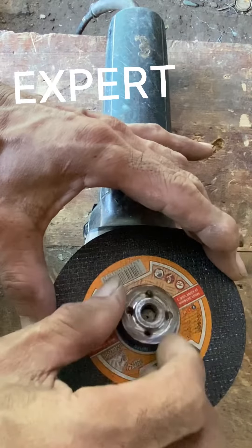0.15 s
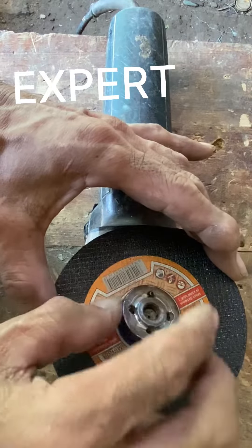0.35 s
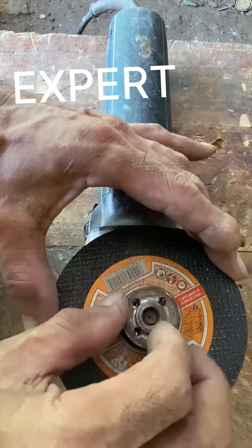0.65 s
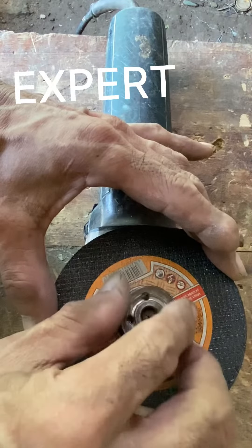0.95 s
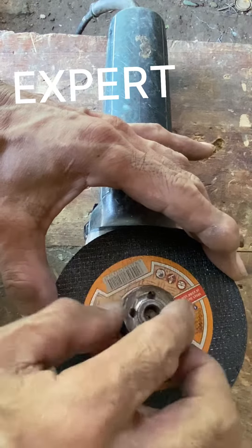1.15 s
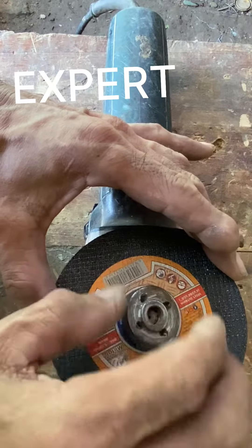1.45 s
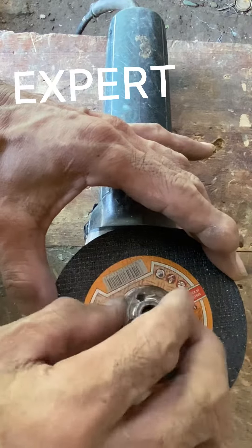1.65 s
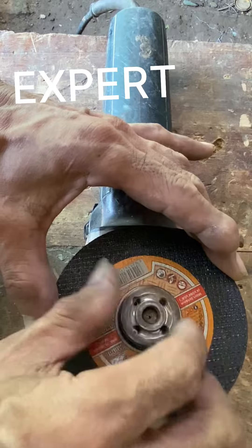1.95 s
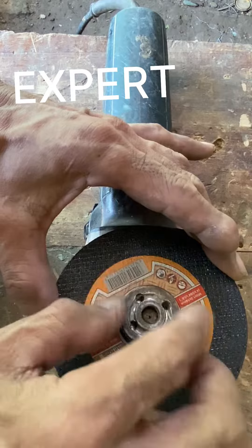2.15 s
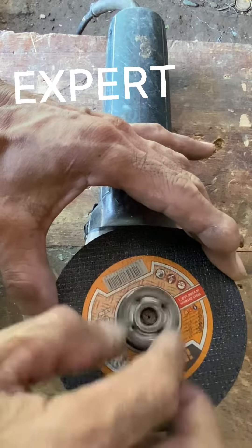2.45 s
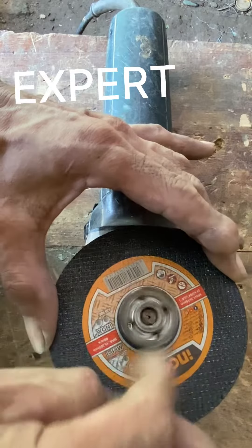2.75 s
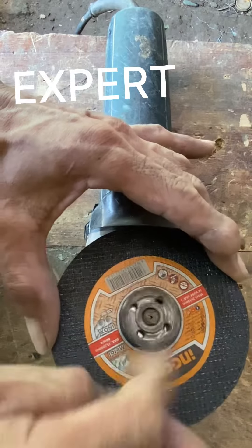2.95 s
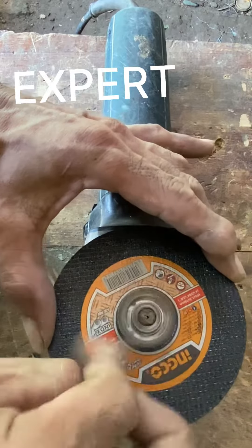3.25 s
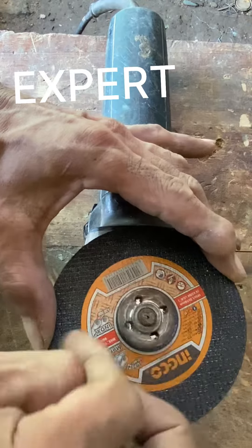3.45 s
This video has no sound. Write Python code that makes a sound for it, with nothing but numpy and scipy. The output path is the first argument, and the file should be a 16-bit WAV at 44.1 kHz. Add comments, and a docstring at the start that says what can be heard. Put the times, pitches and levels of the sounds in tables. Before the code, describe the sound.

A steel nut clicks and scrapes as fingers thread it onto a hand grinder. Scattered taps, some briefly ringing, grow into a busier rattling whirr, with soft bench thumps and faint outdoor hiss behind.

```python
"""A steel lock nut, spun by the fingers down the spindle of a hand grinder on a wooden bench outdoors.
It taps and scrapes on thread and cutting disc, driving their resonances with grit, and a few knocks
set it ringing freely. Late on it whirrs down the thread and a slipping fingertip squeaks.
The bench booms softly under each push; distant rumble and hiss lie below."""
import sys
import numpy as np
from scipy import signal
from scipy.io import wavfile

SR = 44100
rng = np.random.default_rng(int(sys.argv[2]) if len(sys.argv) > 2 else 0)


def inscribe(sig):
    """Save sig as 16-bit PCM at rate SR to the path in sys.argv[1].

    A 1-D sig is mono; a 2-D sig holds one channel per row.
    Samples are clipped to [-1, 1] before scaling.
    """
    pcm = np.round(np.clip(np.atleast_2d(sig).T, -1, 1) * 32767)
    wavfile.write(sys.argv[1], SR, pcm.astype(np.int16))


N = 158760

# Knocks of the nut on thread and disc: start_s, level_db (mid band, 1.1-2.4 kHz), then against it
# lowest_db, low_db, upper_db, high_db, top_db; pan_db, rattle_db, base_t60_s
TAPS = [(0.194, -53.5, -11, 14, -27.5, -37, -37, 1.8333, -32, 0.018),
        (0.2124, -42, -3, 7, -19, -34, -30, 3, -20, 0.013),
        (0.518, -37.5, -10.5, -1, -6, -18.5, -32, 5.4, -18, 0.011),
        (0.7432, -55.5, 7, 5, -22, -18, -20, 1.6, -9.5, 0.0071),
        (1.1612, -39.5, -7, -5, -3, -30, -40, 2.8, -11, 0.0092),
        (1.169, -30, -11, -7.5, -7, -17.5, -24, 5.7, -16, 0.04),
        (1.3453, -23.5, -39, -8, -9.5, -7.5, -12.5, 7.9, -21, 0.0077),
        (1.3554, -33, -13.5, -10.5, -9, -31, -40, 4.4, -24, 0.025),
        (1.3668, -43.5, -7, -5, -2, -30, -40, 3.5, -23, 0.01),
        (1.514, -51, -15, 6, -8, -17, -10, 3.1, -12, 0.0084),
        (1.5851, -33, -9, 2.5, 2, -19, -28, 6.8, -15, 0.012),
        (1.8721, -51, 5.5, 3.5, -25, -24, -29, 6.1, -5, 0.0037),
        (2.377, -35, -6, -7, -1, -20, -35, 5.3, -15, 0.0078),
        (2.4228, -47, -2, -1, 5, -7, -24, 5.9, -2, 0.0049),
        (2.4519, -28.5, -30, -5.5, -2, -2.5, -25, 6.4, -23, 0.013),
        (2.4545, -38.5, -1, -8, -10, -4.5, -25, 5, -6.5, 0.018),
        (2.586, -48.5, -7, 9.5, -11, -7, -11, 1.2, -11, 0.015),
        (2.6306, -32, -22, 0, 3.5, -24, -31, 6.7, -8.5, 0.0093),
        (2.6393, -28.5, -28, -12, 0.5, -16, -28, 6, -22, 0.0097),
        (2.7118, -39.5, 2.5, 2.5, -19, -31, -20, 7.6, -17, 0.017),
        (2.7214, -42.5, 4.5, 10, -27, -32, -31, 10, -34, 0.0055),
        (2.7786, -39.5, -3, 5, -28, -33, -39, 7.1, -33, 0.015),
        (2.809, -44, -12, -15, -14, -8, -15, 6.7, -14.5, 0.0062),
        (2.835, -34.5, -35, -15, 3.5, -3.5, -23, 9, -21, 0.0059),
        (2.9052, -18.5, -37, -1.5, 3, -7, -26, 5.6, -19.5, 0.0065),
        (2.9124, -32.5, 0, -21, -9, -28, -39, 4.7, -28, 0.013),
        (2.9705, -35, -25, 2, 0.5, 8.5, -17, 6.1, -15, 0.008),
        (3.1694, -31.5, -24, -7, -2.5, -15.5, -37, 7.9, -46, 0.0085),
        (3.2125, -49, -15, -6, 5, -24, -35, 8, -28, 0.0058),
        (3.2245, -35, -10, -5.5, -5, -24, -35, 11, -23, 0.0076),
        (3.2585, -36, -14, -2, -10, -30, -29, 8.5, -26, 0.0065)]
# How late the right side hears each of the six bands, low to high: lag_s
RIGHT_LAG_S = [0.00035, 0.00016, 0.00013, 0.00023, 0.0002673, 0.000079]
STRIKE_DB = 17   # a tap's first impact over the grit that follows
BENCH_PAN_DB, FINGER_PAN_DB = -5, 1.5
SIZZLE_HZ = (13700, 16300)   # band of the tap snaps and the nail hiss


def amp(db):
    """Decibels to gain."""
    return 10 ** (np.asarray(db) / 20)


def unit_rms(x):
    """Scale to unit rms."""
    return x / np.sqrt(np.mean(x ** 2) + 1e-20)


def curves(rows):
    """One sample-by-sample curve for each column after time_s."""
    times, *columns = np.transpose(rows)
    return [np.interp(np.arange(N) / SR, times, column) for column in columns]


def at_hz(points, hz):
    """Read a (freq_hz, value) curve on a log frequency axis."""
    freqs, values = np.transpose(points)
    return np.interp(np.log(hz), np.log(freqs), values)


def pan(pan_db):
    """Left and right gains as a column; positive leans left."""
    return amp([[pan_db / 2], [-pan_db / 2]])


def drift(rate_hz):
    """Slow random wander of about unit rms."""
    hop = 40
    pole = np.exp(-2 * np.pi * rate_hz * hop / SR)
    slow = signal.lfilter([1], [1, -2 * pole, pole * pole], rng.standard_normal(N // hop + 2002))[2000:]
    return np.interp(np.arange(N) / hop, np.arange(len(slow)), unit_rms(slow))


def resonate(x, hz, width_hz):
    """Two-pole resonance with unit gain at its peak."""
    r = np.exp(-np.pi * width_hz / SR)
    feedback = [1, -2 * r * np.cos(2 * np.pi * hz / SR), r * r]
    return signal.lfilter([(1 - r * r) / 2, 0, (r * r - 1) / 2], feedback, x)


def band(x, low_hz, high_hz, order=2):
    """Band-pass."""
    return signal.sosfilt(signal.butter(order, [low_hz, high_hz], "band", fs=SR, output="sos"), x)


def outdoor_air():
    """Outdoor hiss: half-octave bands of noise, each with its own flicker and stereo width."""
    spectrum = [(18, -31), (30, -6), (109, -4.5), (340, -15), (625, -21.5), (2810, -34), (5030, -34),
                (7880, -42.5), (11100, -42), (13000, -43), (15200, -52), (16500, -89)]   # freq_hz, relative_density_db
    likeness = [(60, 1), (240, 0.37), (950, 0.025), (3770, 0.027), (15000, 0.16)]   # how alike the sides are: freq_hz, correlation
    lean = [(60, -1), (240, -5.5), (950, 3.5), (3770, -0.5), (15000, 0)]   # freq_hz, pan_db
    out, edges = 0, 30 * 2 ** np.arange(0, 9.6, .5)
    white = rng.standard_normal((2, 2, N))
    for k, (low, high) in enumerate(zip(edges, np.minimum(edges[1:], 20000))):
        mid, side = band(white[k % 2], low, high)
        hz = np.sqrt(low * high)
        alike = at_hz(likeness, hz)
        gain = amp(at_hz(spectrum, hz) + 1.28 * drift(rate_hz=5.8)) * pan(at_hz(lean, hz))
        out = out + gain * (np.sqrt(1 + alike) * mid + np.sqrt(1 - alike) * side * [[1], [-1]])
    return amp(-55.5) * unit_rms(out)


def low_noise(level_db, hz, width_hz):
    """Noise in one low resonance, slightly wide, riding a level curve."""
    white = rng.standard_normal((2, N + SR))
    mid, side = resonate(resonate(white, hz, width_hz), hz, 2 * width_hz)[:, SR:]
    return amp(level_db) * unit_rms(mid + amp(-9.5) * side * [[1], [-1]])


def far_rumble():
    """A narrow, distant bass rumble that swells and sinks."""
    swells = [(0.0, -58), (0.39, -55), (2.58, -77), (2.61, -56), (3.07, -60), (3.18, -70), (3.44, -45.5),
              (3.6, -82.5)]   # time_s, level_db
    level_db, = curves(swells)
    return low_noise(level_db, hz=55, width_hz=16)


def bench_boom():
    """The wooden bench's low modes swell under each push."""
    pushes = [(0.0, -91), (0.2, -65.5), (1.05, -64.5), (1.2, -48.5), (1.33, -80), (1.38, -51), (1.5, -65.5),
              (1.62, -45.5), (1.72, -50), (1.75, -77), (2.1, -74), (2.24, -48.5), (2.29, -80), (2.68, -44),
              (2.74, -70), (2.86, -42.5), (2.95, -56.5), (3.04, -40), (3.14, -66), (3.26, -43), (3.34, -61),
              (3.42, -39.5), (3.54, -86), (3.6, -68)]   # time_s, level_db
    modes = [(95.4, 10.1, -0.5), (140, 59, -13), (191.6, 50, -12.5)]   # pitch_hz, width_hz, gain_db
    level_db, = curves(pushes)
    return sum(amp(db) * low_noise(level_db, hz, width) for hz, width, db in modes) * pan(BENCH_PAN_DB)


def grit(per_s, spread_db, width):
    """Dense, uneven micro-impacts in stereo; width runs from 0 (mono) to 1 (unrelated sides)."""
    def grains():
        sizes = amp(spread_db * np.minimum(rng.exponential(1, N), 4)) * rng.choice([-1, 1], N)
        return unit_rms(sizes * (rng.random(N) < per_s / SR) + 1e-9)
    left, other = grains(), grains()
    return np.array([left, np.sqrt(1 - width ** 2) * left + width * other])


def taps_and_scrapes():
    """Gritty contact force and the envelope of the rattle after it, per band and side."""
    scrapes = [ (0.428, -57.5, -1, -2, -34, -29, -26, 1.3, -25, 0.053, 0.013, 0.01),
               (0.913, -56, 3.5, 0.5, -11, -17.5, -21, 4.7, -24, 0.06, 0.0072, 0.023),
               (1.212, -49, -7, -2.5, -16, -28, -38, 3.4, -9, 0.019, 0.0083, 0.016),
               (1.52, -57.5, 1.5, -2, -3, -8, -12, 4, -21, 0.046, 0.0074, 0.012),
               (1.939, -58.5, -9, 11, -8, -23, -24, 3.3, -32, 0.036, 0.008, 0.0077),
               (2.165, -49.5, -12, -5.5, -9.5, -17, -39, 3.4, -7, 0.18, 0.0084, 0.016),
               (2.603, -52.5, -3, -24, 0, -1, -10, 5, -37, 0.039, 0.0082, 0.03),
               (2.648, -48, 5, -26, -12, -26, -16, 4.5, -11, 0.042, 0.0054, 0.0051),
               (2.814, -40.5, -0.5, 2, -5, -9, -18.5, 6.8, -8.5, 0.097, 0.014, 0.0061),
               (2.895, -17.5, -12.5, -11, -1, -16, -24.5, 8.7, -33, 0.055, 0.013, 0.0017),
               (3.018, -19.5, -10, -9, 2, -14, -21.5, 6.8, -50, 0.066, 0.011, 0.021),
               (3.193, -41, -12, 2, -3, -23, -25, 8.5, -5.5, 0.029, 0.0065, 0.025),
               (3.289, -41.5, -26, -8, 1, 7, 9, 8.7, -15.5, 0.028, 0.0063, 0.011),
               (3.376, -30.5, -12.5, -19, -3.5, 2, -1, 6.4, -20.5, 0.012, 0.0039, 0.011)]   # nut or fingernail sliding: the columns of TAPS, then rise_s, hold_s
    decay_scale = [1.8, 2, 1.53, 1.44, 1.5, 0.72]   # the top dies soonest; per band: t60_factor
    rattle_colour = [-0.5, 2.5, 0.5, -9, -10, -2.5]   # per band: gain_db
    lead_in_db, rattle_t60_s = -32.5, 0.18
    firm_grit = np.tile(grit(per_s=9000, spread_db=2.5, width=0.55), 2)
    force, rattle = np.zeros((2, 6, 2, N + SR // 4))
    t = np.arange(SR // 5) / SR
    for start_s, db, lowest, low, upper, high, top, pan_db, rattle_db, t60_s, *stroke in TAPS + scrapes:
        span = slice(int(start_s * SR), int(start_s * SR) + len(t))
        gain = amp(db - 8 + np.array([lowest, low, 0, upper, high, top]))[:, None, None] * pan(pan_db)
        rise_s, hold_s = stroke or (0, 0)
        swell = amp(lead_in_db * np.maximum(1 - t / max(rise_s, 1e-4), 0))
        release_s = np.maximum(t - rise_s - hold_s, 0)
        band_t60_s = np.multiply(max(t60_s, .003), decay_scale)[:, None, None]
        contact = swell * amp(-60 * release_s / band_t60_s) * firm_grit[:, span]
        if not stroke:   # a tap opens with a one-sample strike
            contact[..., 1] = amp(STRIKE_DB)
        force[..., span] += gain * contact
        tail = amp(rattle_db - 60 * release_s / rattle_t60_s)
        rattle[..., span] += gain * swell * tail * amp(rattle_colour)[:, None, None]
    return force[..., :N], rattle[..., :N]


def disc_and_nut(force, k):
    """Band k of disc and nut: their resonances over plain scratch, at unit power gain."""
    resonances = [(370, 57, -5), (687, 70, 0.5), (813, 90, -0.5), (972, 71, -4.5), (1433, 190, -7),
                  (1646, 36, 9.5), (1898, 370, -4.5), (2120, 38, -7.5), (2670, 270, -2.5), (3025, 196, 2.5),
                  (3580, 210, -10), (4820, 2300, -28), (6000, 1300, -21.5), (7040, 860, -26.5),
                  (10300, 1700, -17.5), (10500, 220, -7.5)]   # pitch_hz, width_hz, relative_db
    edges = [260, 520, 1100, 2400, 4200, 8500, 12600]   # bounds of the six bands: edge_hz
    scratch = [-16, -24.5, -9.5, -19, -19.5, -12]   # unpitched scratch against each band's strongest mode: gain_db
    lean = [-9, -3, 1, 0, -5, -10]   # per band: pan_db
    low, high = edges[k:k + 2]
    modes = [mode for mode in resonances if low <= mode[0] < high]
    strongest_db = max(db for _, _, db in modes)
    drive = np.vstack([force, np.arange(N) == 0]) + 1e-18   # third row: an impulse to normalise by
    ringing = sum((-1) ** j * amp(db - strongest_db) * resonate(drive, hz, width)
                  for j, (hz, width, db) in enumerate(modes))
    left, right, impulse = band(amp(scratch[k]) * drive + ringing, low, high, order=4)
    right = np.interp(np.arange(N) - RIGHT_LAG_S[k] * SR, np.arange(N), right)
    return pan(lean[k]) * np.array([left, right]) / np.sqrt(np.sum(impulse ** 2))


def housing_thud(force, hz=160, width_hz=92):
    """The grinder's housing answers each contact with a dull knock."""
    knock = resonate(resonate(force, hz, width_hz), hz, width_hz)
    return amp(-11.5) * np.sqrt(SR / width_hz) * knock * pan(BENCH_PAN_DB)


def nut_contacts():
    """Taps, scrapes, rattle and whirr all drive the same disc and nut, over the housing's thud."""
    force, rattle = taps_and_scrapes()
    whirr = thread_whirr()
    chatter = grit(per_s=1500, spread_db=4, width=0.93)   # the loose nut on the thread
    metal = sum(disc_and_nut(force[k] + (rattle[k] + whirr[k]) * chatter, k) for k in range(6))
    return metal + housing_thud(force[0].mean(axis=0))


def tap_snaps():
    """The thin, bright edge of each tap's first impact."""
    clicks = np.zeros((2, N)) + 1e-18
    for start_s, level_db, *_, top_db, _pan, _rattle, _t60 in TAPS:
        clicks[:, int(start_s * SR)] = amp(level_db + top_db + STRIKE_DB - 4.5)
    return band(clicks, *SIZZLE_HZ)


def nut_rings():
    """The knocked nut rings freely and rocks on its seat, a lower note that changes with the grip."""
    knocks = [(.519, -49, -9, 1370), (1.1692, -22, 5, 1310), (1.1775, -32, -3, 1110),
              (1.3459, -23, 9, 1103), (1.3552, -42, 5, 1480), (1.5853, -34, -5, 700),
              (2.452, -36.5, -4, 1240)]   # start_s, level_db, pan_db, seat_pitch_hz
    steel_modes = [(2084, -9.5, 0.058), (3600, -8.5, 0.025)]   # pitch_hz, gain_db, t60_s
    seat_t60_s, softness_hz = 0.013, 3600
    pole = np.exp(-2 * np.pi * softness_hz / SR)
    out, t = np.zeros((2, N)), np.arange(SR // 20) / SR
    for start_s, level_db, pan_db, seat_hz in knocks:
        modes = [(seat_hz, 0, seat_t60_s), *steel_modes]
        ring = sum(amp(db - 60 * t / t60) * np.sin(2 * np.pi * hz * t) for hz, db, t60 in modes)
        softened = signal.lfilter([(1 - pole) ** 2], [1, -2 * pole, pole ** 2], ring)
        start = int(start_s * SR)
        out[:, start:start + len(t)] += amp(level_db) * pan(pan_db) * softened
    return out


def thread_whirr():
    """Flickering envelopes, one per band, of the nut whirring down the thread."""
    spin = [(2.5, -73.5, 9, -18), (2.55, -83, -2, -1), (2.646, -71.5, 5, -1), (2.752, -71, 16, -17),
            (2.882, -59.5, 7, 0.5), (2.955, -64, 2.5, -2), (3.01, -50, -10.5, -4.5), (3.046, -52.5, 20, 17),
            (3.136, -57.5, -25, -20), (3.222, -65.5, 0, 1), (3.272, -59.5, 2.5, -11), (3.332, -71, 2, -1),
            (3.4, -66, 8, 13)]   # time_s, level_db, then against the mids low_db, high_db
    fade_in, fade_out = (spin[0][0] - .05, -95, 0, 0), (spin[-1][0] + 0.088, -95, 0, 0)
    level_db, low_db, high_db = curves([fade_in, *spin, fade_out])
    envelope = amp(level_db + 5 * drift(rate_hz=17)) * pan(FINGER_PAN_DB)
    return [amp(db) * envelope for db in (-3.5, low_db, 0, 0, high_db, high_db - 13.5)]


def finger_squeaks():
    """A fingertip slips off: a rough tone gliding down, with a thin nail hiss."""
    slips = [(2.807, 0.018, 1360, 1290, -45, -30), (3.296, 0.024, 3150, 1355, -43.5, 1),
             (3.367, 0.0088, 2320, 2220, -42, -25), (3.377, 0.016, 2750, 1286, -31, -12)]   # start_s, length_s, start_hz, end_hz, level_db, relative_hiss_db
    flutter_hz, flutter_depth = 260, .35
    glide_bend = 0.83   # below 1, the pitch falls fastest at first
    pole = np.exp(-np.pi * flutter_hz / SR)
    flutter = 1 + flutter_depth * unit_rms(signal.lfilter([1], [1, -pole], rng.standard_normal(N)))
    tone, envelope, hiss_gain = np.zeros((3, N))
    for start_s, length_s, start_hz, end_hz, level_db, hiss_db in slips:
        progress = np.linspace(0, 1, int(length_s * SR))
        span = slice(int(start_s * SR), int(start_s * SR) + len(progress))
        pitch_hz = start_hz * (end_hz / start_hz) ** (progress ** glide_bend)
        tone[span] = np.sin(2 * np.pi * np.cumsum(pitch_hz) / SR)
        envelope[span] = amp(level_db) * np.sqrt(np.abs(np.sin(np.pi * progress ** .5)))
        hiss_gain[span] = amp(hiss_db)
    hiss = hiss_gain * unit_rms(band(rng.standard_normal((2, N)), *SIZZLE_HZ, order=4))
    return envelope * (tone * flutter * pan(FINGER_PAN_DB) + hiss)


def scene():
    """Nut and fingers over the bench and the outdoor bed."""
    pings = tap_snaps() + nut_rings()
    pings[1] = np.roll(pings[1], int(RIGHT_LAG_S[2] * SR))
    return nut_contacts() + pings + finger_squeaks() + bench_boom() + far_rumble() + outdoor_air()


def record(dry):
    """The treble is hollowed out around 14 kHz; the deepest bass and the very top are cut."""
    hollows = [(14000, 1080, 1)]   # centre_hz, width_hz, share_removed
    for hz, width_hz, share in hollows:
        dry = dry - share * resonate(dry, hz, width_hz)
    dry = signal.sosfilt(signal.butter(2, 34, "high", fs=SR, output="sos"), dry)
    return signal.sosfilt(signal.cheby2(12, 70, 16900, fs=SR, output="sos"), dry)


dry = scene()
out = record(dry)
inscribe(out)
```